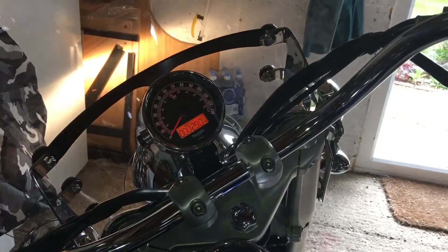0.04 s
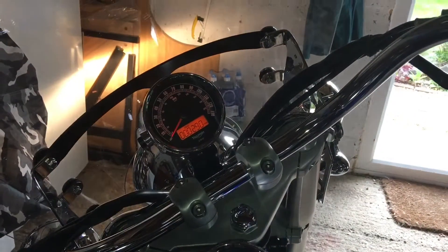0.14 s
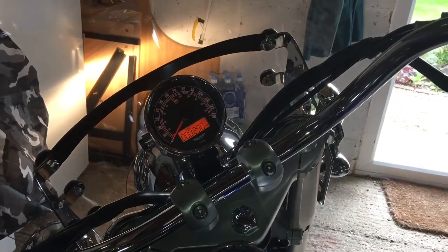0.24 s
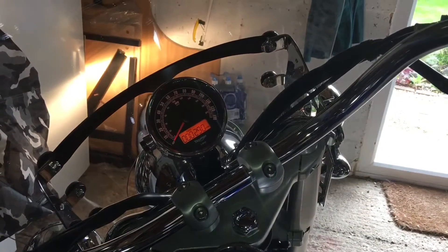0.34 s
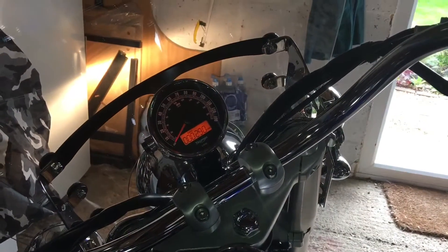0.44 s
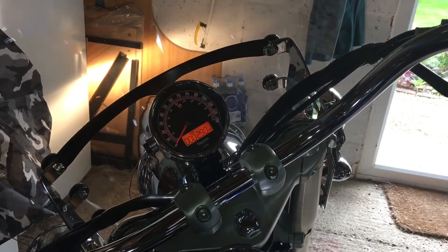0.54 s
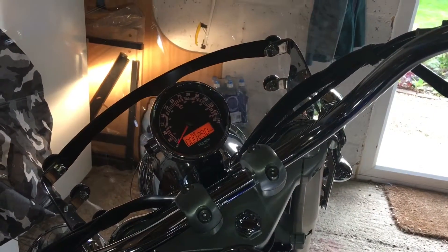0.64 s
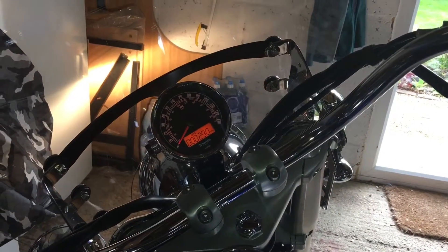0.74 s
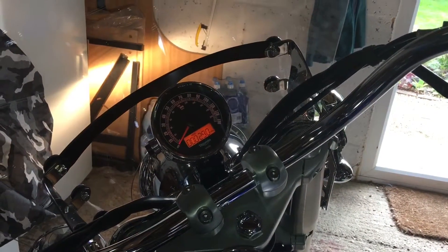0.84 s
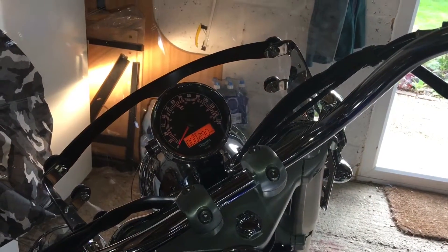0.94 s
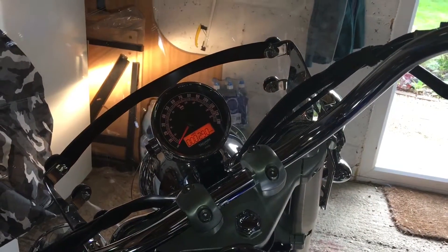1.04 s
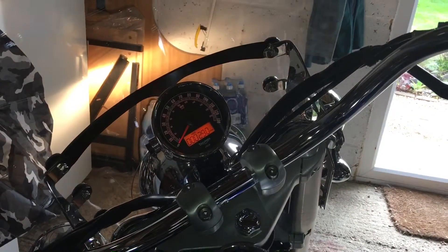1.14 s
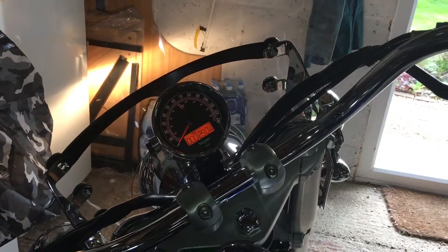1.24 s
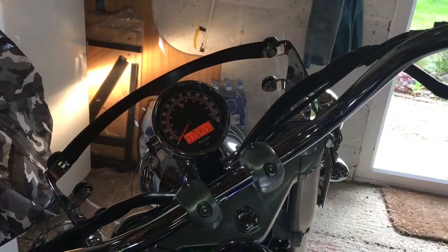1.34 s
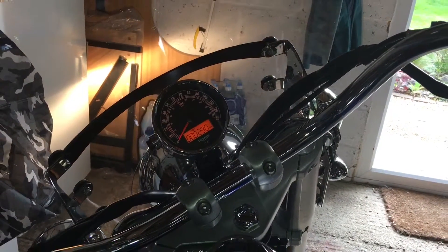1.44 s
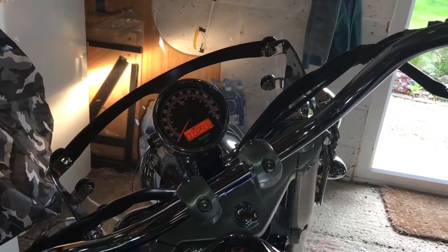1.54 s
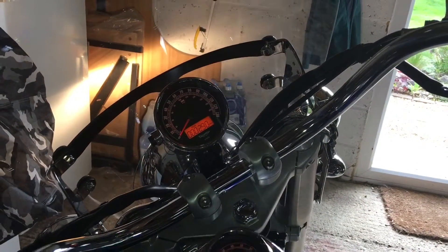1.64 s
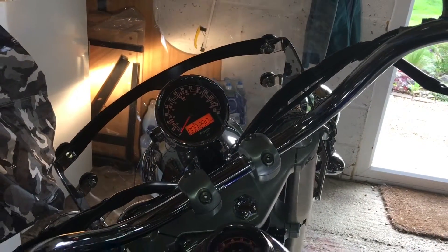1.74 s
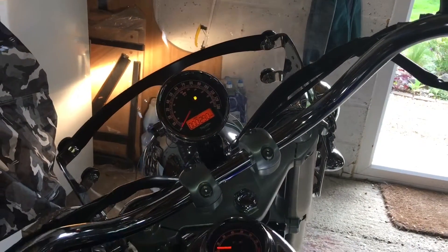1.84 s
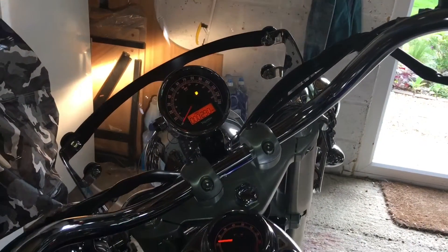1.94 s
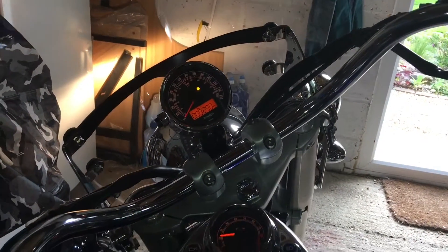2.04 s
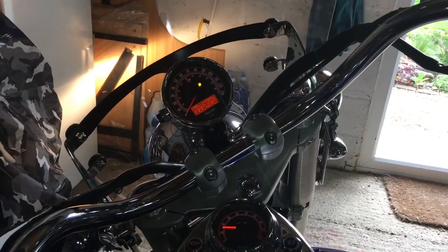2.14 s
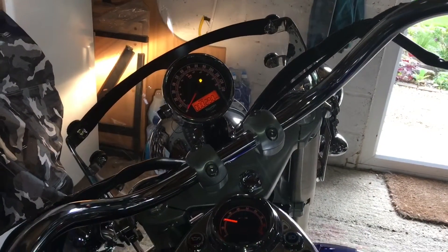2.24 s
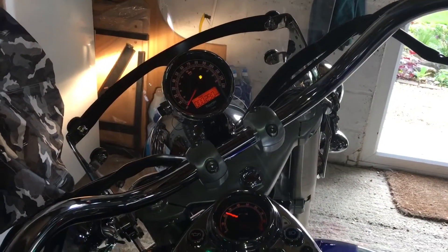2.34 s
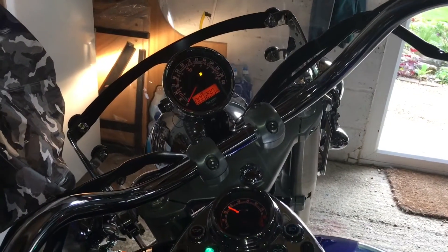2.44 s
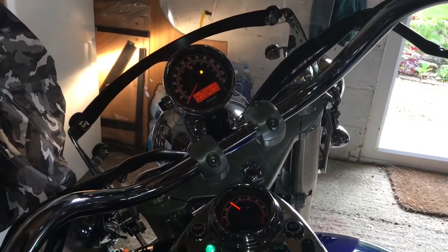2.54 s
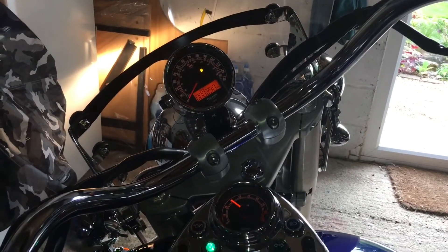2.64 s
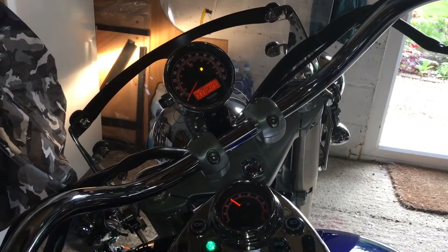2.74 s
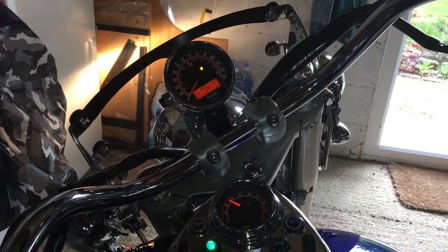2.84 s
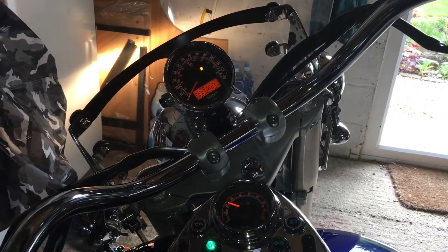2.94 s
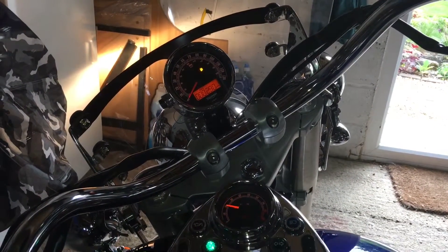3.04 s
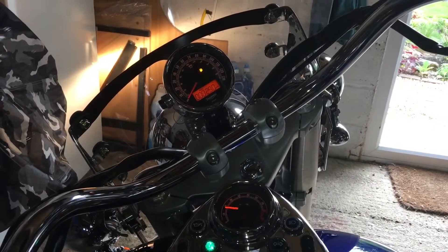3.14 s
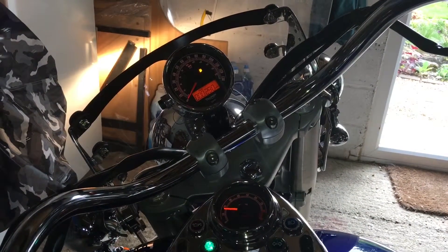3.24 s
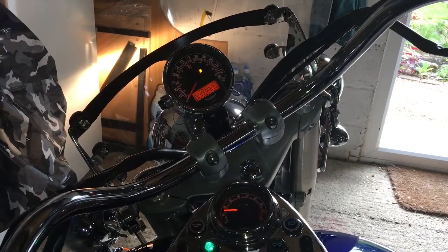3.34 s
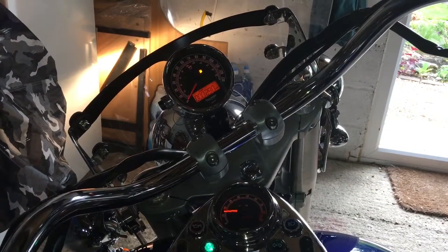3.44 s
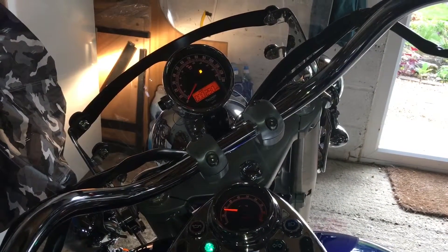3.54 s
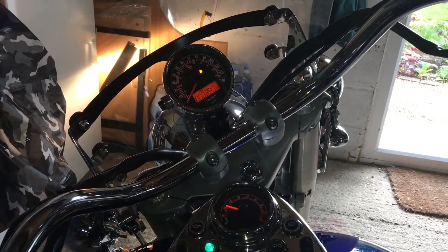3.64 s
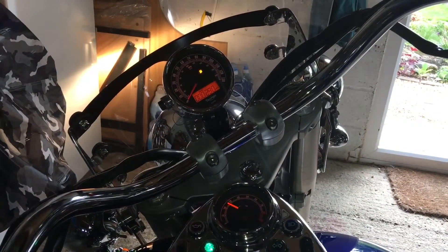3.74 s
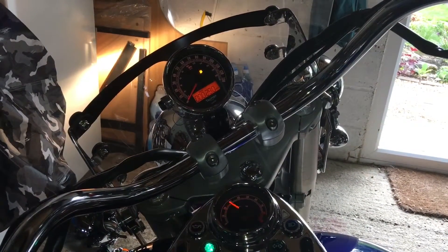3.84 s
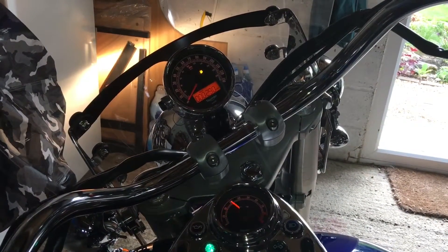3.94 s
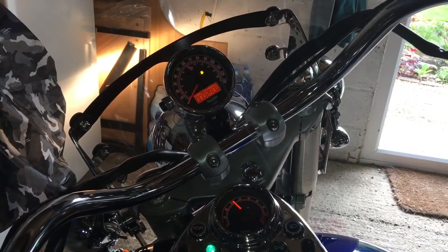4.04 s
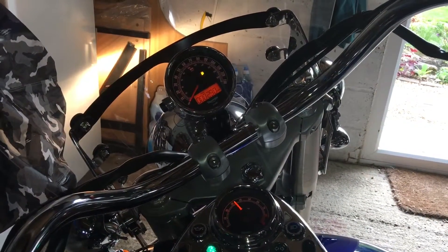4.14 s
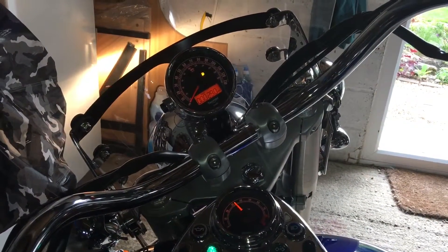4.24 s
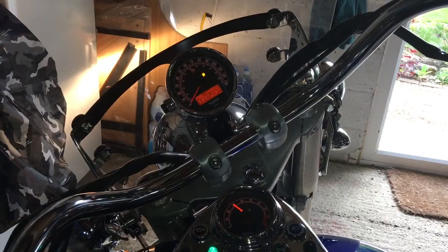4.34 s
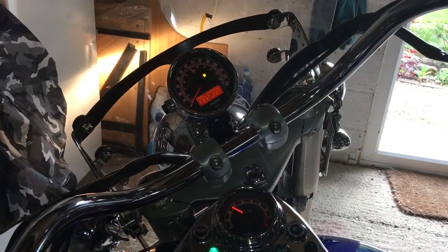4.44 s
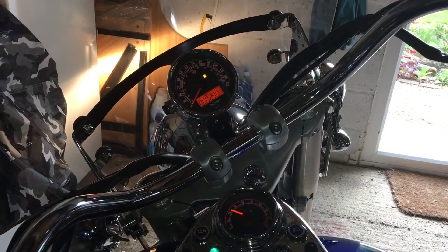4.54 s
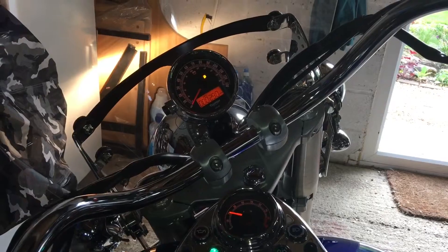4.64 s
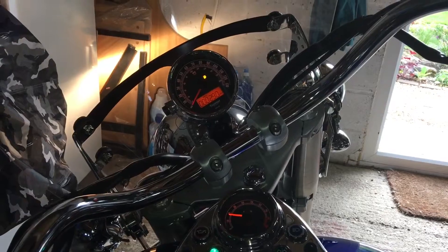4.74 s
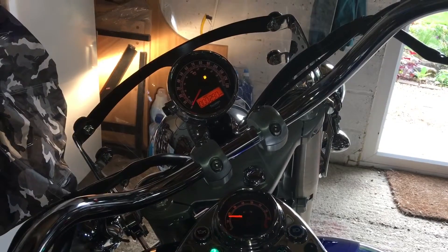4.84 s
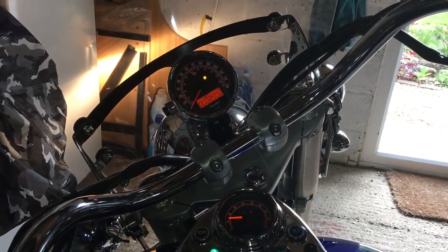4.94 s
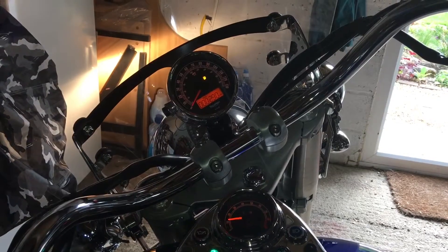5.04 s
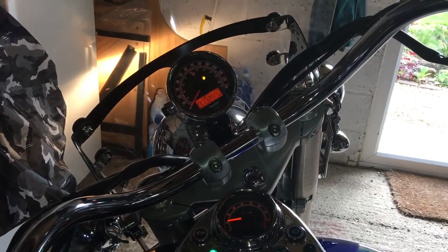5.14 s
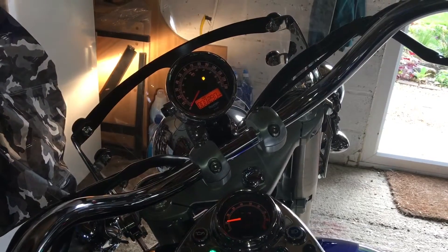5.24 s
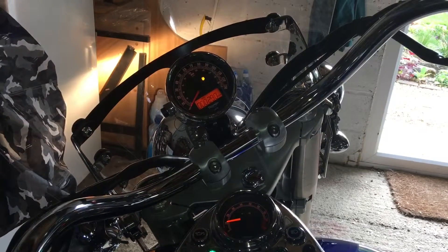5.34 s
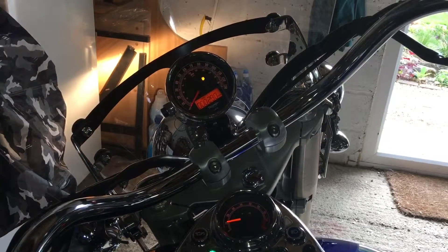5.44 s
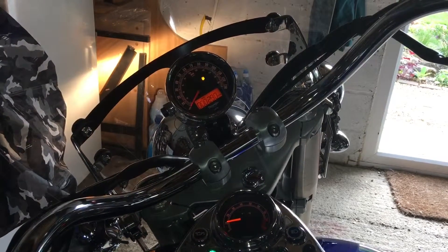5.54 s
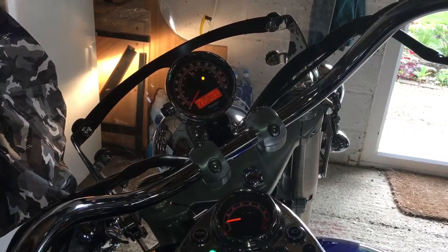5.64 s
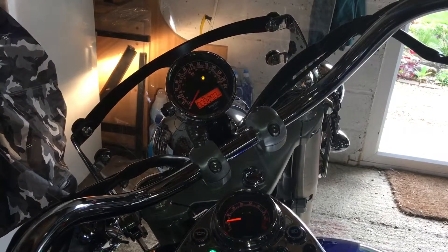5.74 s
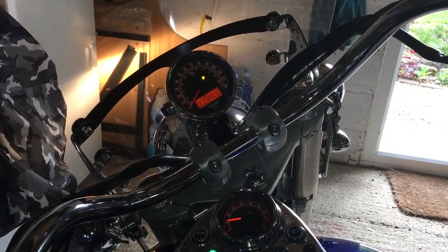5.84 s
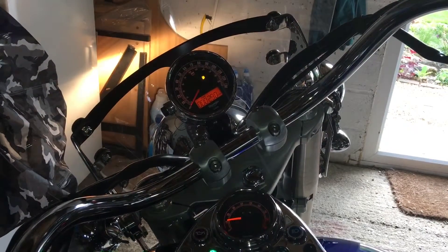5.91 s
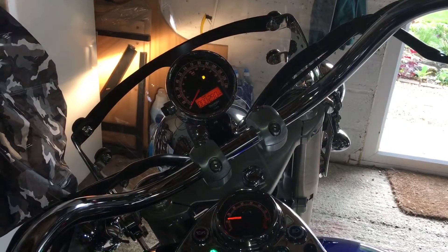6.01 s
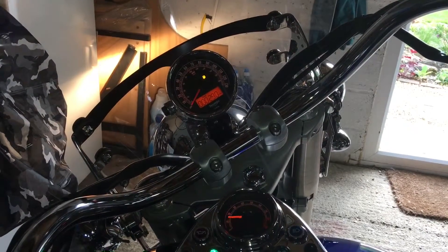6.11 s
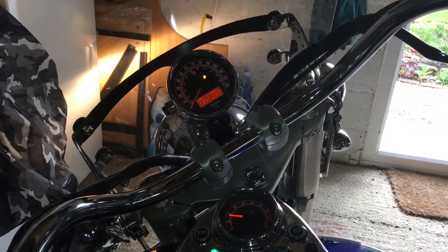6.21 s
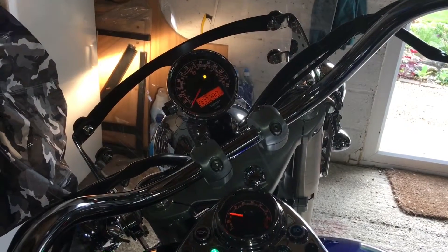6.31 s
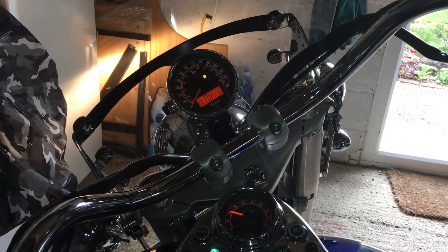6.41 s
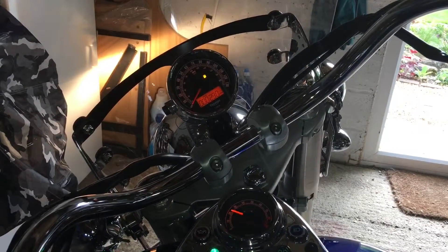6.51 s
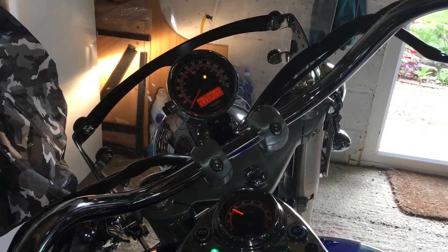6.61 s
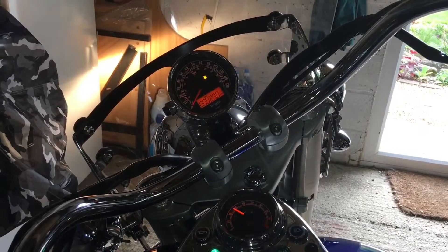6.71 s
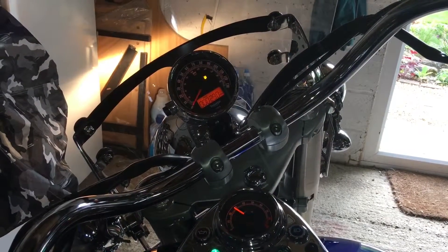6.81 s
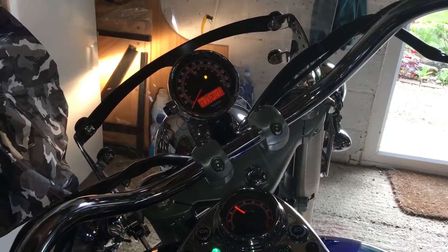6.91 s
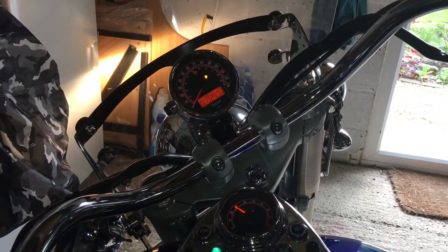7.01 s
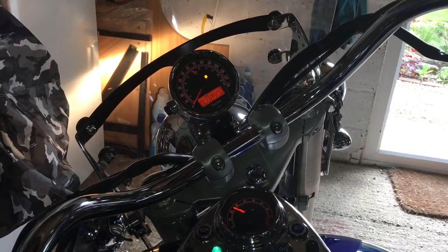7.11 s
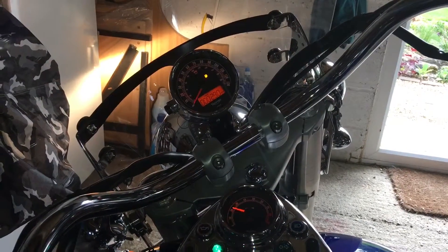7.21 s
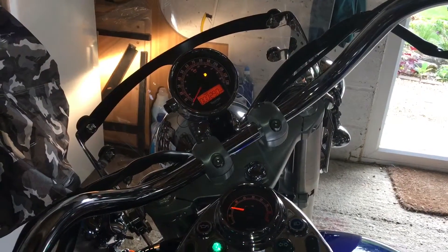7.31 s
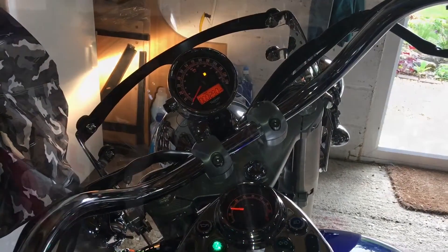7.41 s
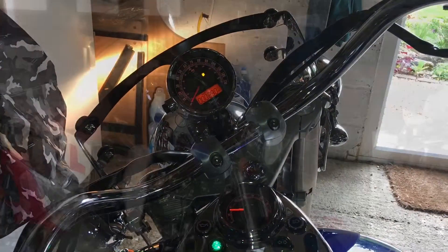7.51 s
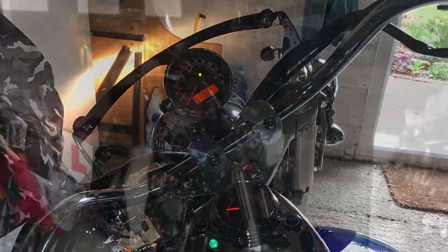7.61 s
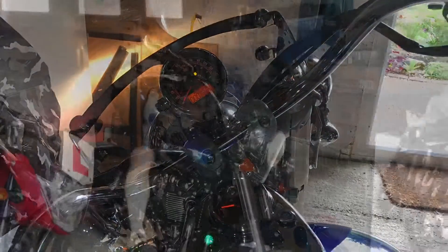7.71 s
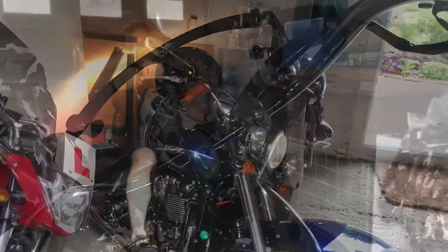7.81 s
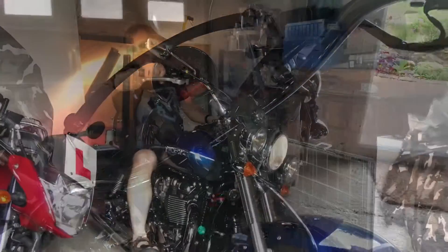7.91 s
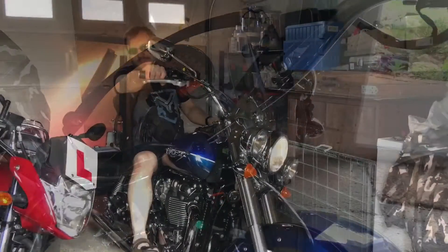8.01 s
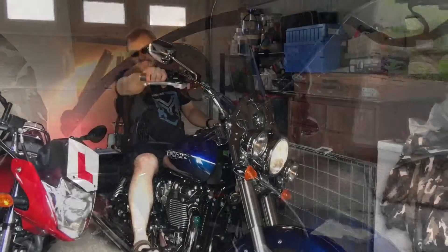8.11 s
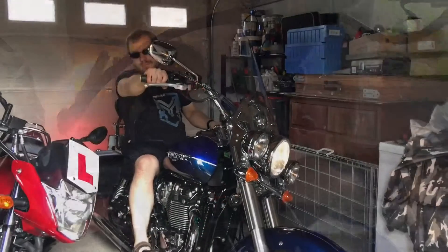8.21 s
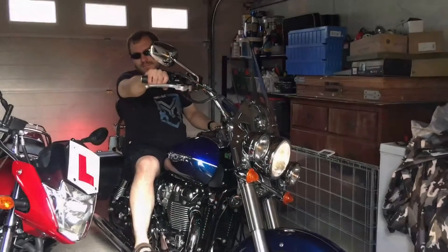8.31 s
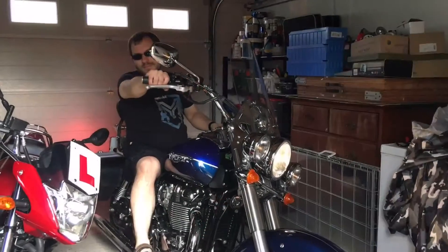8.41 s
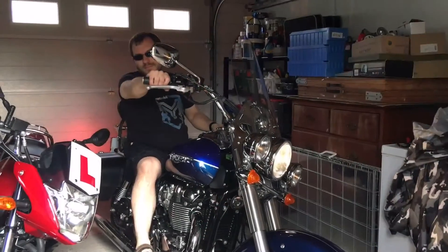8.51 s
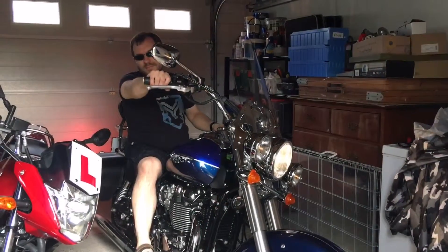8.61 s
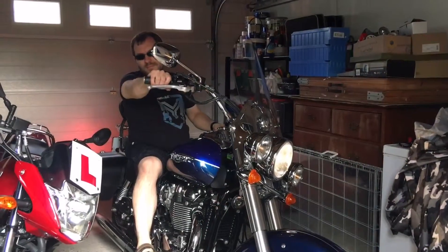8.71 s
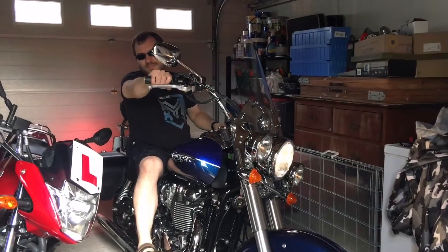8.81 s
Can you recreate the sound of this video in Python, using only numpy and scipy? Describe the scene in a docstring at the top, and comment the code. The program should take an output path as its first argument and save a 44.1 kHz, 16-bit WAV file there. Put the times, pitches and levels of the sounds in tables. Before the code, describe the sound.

A twin-cylinder motorcycle engine is heard close up in a garage through a small microphone thin in deep bass. It starts at raised revs, already falling, until about 0.5 s, when a strong blip climbs to the highest growl near 1.0 s; the throttle shuts with a low boom and revs sink to a lumpy idle by 1.95 s. A second burst peaks around 2.6 s and falls by 3.4 s; a third snaps open, peaks at 4.1 s, booms and drops to slow, uneven thumps from 4.9 to 5.7 s. A gentler swell peaks near 6.9 s and fades to idle by 7.7 s. Dense valve clatter, gear whine, raspy exhaust and pulsing intake hiss follow the speed. Around 7.6 s the sound crosses to a second position with weaker clatter and exhaust and stronger hiss, idling unevenly until a fresh throttle jab begins at 8.7 s.

```python
"""A twin-cylinder motorcycle engine idles in a garage and is blipped several times.
Two uneven firings a cycle thump through the exhaust and the garage, merging into a growl as the throttle
opens; rasping gas rings the panels, and a boom follows as it shuts. The valve gear clatters, gears whine
at multiples of the engine speed, and the intake hisses at each suction stroke. The small microphone is thin
in the bass; late on, the sound cuts to a second place with weaker clatter and exhaust and stronger hiss."""
import sys
import numpy as np
from scipy import signal
from scipy.fft import rfft, irfft, next_fast_len
from scipy.io import wavfile
from scipy.ndimage import uniform_filter1d

SR = 44100
rng = np.random.default_rng(int(sys.argv[2]) if len(sys.argv) > 2 else 0)


def materialize(psi):
    """Save the field psi as 16-bit PCM at rate SR to the path in sys.argv[1].

    A 1-D psi becomes a single channel; in a 2-D psi each row is a channel.
    """
    bounded = np.clip(np.atleast_2d(psi).T, -1, 1)
    quanta = np.round(bounded * 32767).astype(np.int16)
    wavfile.write(sys.argv[1], SR, quanta)


N = 390726

# engine speed: time_s, rate_cycles_per_s (four-stroke cycles)
ENGINE_SPEED = [(0.0, 22.63), (0.25, 16.7), (0.52, 12.0), (0.6, 14.01), (0.9, 29.67), (1.0, 30.47),
                (1.2, 24.77), (1.4, 17.48), (1.55, 14.11), (1.8, 9.27), (1.95, 7.79), (2.02, 8.0),
                (2.15, 14.76), (2.4, 22.58), (2.6, 25.7), (2.8, 19.32), (3.05, 13.73), (3.38, 8.86),
                (3.5, 14.79), (3.8, 23.97), (4.1, 27.7), (4.2, 27.21), (4.5, 17.0), (4.9, 8.5), (5.2, 7.15),
                (5.7, 7.53), (6.0, 10.3), (6.6, 21.32), (6.9, 23.25), (7.1, 17.93), (7.5, 9.8), (7.7, 7.34),
                (8.1, 7.55), (8.75, 7.4), (8.86, 9.01)]
# throttle blips: opens_s, rise_s, shuts_s, load (about 1 is full), held_share of that load, boom_db after shutting
THROTTLE_BLIPS = [(-.4, .05, 0.074, 0.76, .3, -28), (.53, 0.11, 1.038, 1., 0.24, -3.5),
                  (2.015, 0.012, 2.66, 1.01, 0.11, -27), (3.4, 0.0067, 4.19, .9, 0.42, -4.5),
                  (5.55, 0.54, 6.95, 0.6, 0.13, -22), (8.7, .06, 8.8, 0.8, .3, -60),
                  (8.805, 0.019, 10.7, 0.9, .3, -60)]
# firings out of line: time_s, length_s, level_db against the rest; weak ones are misfires
ODD_FIRINGS = [(0.458, 0.034, -14), (1.3, 0.014, -1), (1.7, 0.22, -4.5), (1.825, .03, 13),
               (1.953, 0.055, -13), (2.055, 0.032, 8.5), (2.18, 0.051, 4.5), (2.306, 0.11, 2.5),
               (2.945, 0.057, 4), (3.163, 0.088, -6), (3.26, 0.032, 4), (3.53, 0.034, 7), (3.64, 0.024, 0),
               (4.498, 0.023, 3), (4.59, .03, 0), (4.666, 0.03, -23), (4.848, 0.15, -5.5),
               (5.085, 0.037, -24), (5.195, 0.028, 0), (5.94, 0.019, 4), (6.122, 0.045, 4.5),
               (6.29, 0.12, 10), (7.195, 0.035, 6.5), (7.44, 0.14, -2.5), (8.13, .03, -3),
               (8.274, 0.053, -16), (8.38, .05, 2.5)]
# balance of the two cylinders: thump_db, hiss_db
CYLINDERS = [(-2.5, -2.0), (0, 0)]

# level laws: idle_db, per_speed_doubling_db, full_load_db, second_place_db
FIRING_LAW = (-15.5, 3, 10, -3)
RASP_LAW = (-31, 2.5, 7, -3.5)
CLATTER_LAW = (-34.5, 4.5, 5.5, -4)
INTAKE_LAW = (-58.5, 14, 7.5, 9)
IDLE_JET_LAW = (-58, 1, 14, -5)

# spectrum of the throttle hiss: frequency_hz, density_db
HISS_SPECTRUM = [(2000, 15), (5000, 13.5), (8000, 9), (9800, 5.5), (10500, -7), (11200, 4), (13000, -4),
                 (16000, -7)]
# spectrum of the small jet: frequency_hz, density_db
JET_SPECTRUM = [(3000, -25), (6000, -10), (9800, 1), (10500, -8), (11200, 6), (16000, -3)]
# knocks heard through the casing: frequency_hz, level_db
CASING_SPECTRUM = [(530, -20), (900, -30), (1270, -1.5), (1580, 1), (1930, 4), (2070, 1.5), (2250, 0),
                   (2930, -3), (4660, -8.5), (5180, -8.5), (6980, -11.5), (10500, -22.5), (15500, -24.5)]
# casing modes rung by the knocks: frequency_hz, width_hz, level_db
CASING_MODES = [(1290, 31, -33.5), (1574, 13, -51), (1797, 59, -33), (1906, 3.3, -21), (2240, 40, -14),
                (2413, 12, -17.5), (2936, 28, -19.5), (3950, 31, -26), (5270, 26, -24), (5850, 70, -26),
                (6310, 57, -28), (7200, 67, -28)]
# gear and chain whines: multiple of the cycle rate, level_db against the clatter, rise_db per speed doubling
GEAR_WHINES = [(48, -17, 5), (64, -19, 7), (96, -7, 0), (128, -9, 0), (206, -4, -6)]
# casing colour on the whines: frequency_hz, level_db
WHINE_CASING = [(700, -30), (960, -5.5), (1150, -7.5), (1400, -2), (1550, -0.7), (1750, 3), (2050, -1.5),
                (2400, 0.1), (2650, -10), (2950, 3), (3300, -15)]
# spectrum of the exhaust gas: frequency_hz, density_db
RASP_SPECTRUM = [(15, -21), (35, 15), (70, -8), (200, -1.5), (350, -9), (500, -11), (950, -10.5),
                 (1400, -14), (3000, -68)]
# panels set ringing by the rasp: frequency_hz, width_hz, level_db
PANEL_MODES = [(458.3, 8.8, -14), (531, 25, -30.5), (644, 10, -22), (298, 1.9, -28)]
# exhaust and garage modes: frequency_hz, width_hz, level_db
PIPE_MODES = [(44.4, 37, -11), (82.4, 7.44, -2), (95.04, 34, 4.9), (104.9, 17.9, -6.5), (137.4, 30.3, -12),
              (173, 29, -29), (233, 65, -9)]
# wall echoes of the thump: delay_s, level_db
WALL_ECHOES = [(.047, -12), (.09, -17)]
# growl of even firing: multiple of the cycle rate, level_db; 270 degree spacing weakens 4, 7, 9 and 12
GROWL_ORDERS = [(2, -12), (3, -8.5), (4, -15.5), (5, 1.84), (6, -4), (7, -19), (8, -17.5), (9, -16),
                (10, -16.5), (11, -25), (12, -47), (13, -28.5)]
# pipe colour on the growl: frequency_hz, level_db
GROWL_PIPE = [(40, -5), (70, -5.5), (85, 3), (105, 3), (130, -1), (170, -1.5), (250, -1.5), (400, 1)]

IDLE_RATE = 7.3  # cycles per s
FIRST, GAP = 0.06, 3 / 8  # first stroke and 270 crank degrees to the second, as shares of the cycle
SECOND_PLACE_S, CUT_FADE_S = 7.58, 0.17  # the sound cuts over to a second microphone place
SAG_S, SHUT_S = 0.31, 0.098  # the load sags to its held share as the revs catch up; time to shut
FILL_S = 0.039  # the charge reaches the cylinders this long after the throttle moves
# share of the firing that repeats evenly: at idle, per speed doubling, throttle open, under load
EVEN_AT_IDLE, EVEN_PER_DOUBLING, EVEN_OPEN, EVEN_LOAD = 0.13, 0.22, 0.54, -0.49
BOOM_RISE_S, BOOM_HOLD_S, BOOM_S = 0.019, 0.11, 0.05  # rise, hold and decay after the throttle shuts
BOOM_MULTIPLE, BOOM_HZ, BOOM_WIDTH_HZ = 3, 80, 33  # multiple of the cycle rate, and its pipe mode
EDGE_HZ = 15740  # upper limit of the microphone


def gain_of(db):
    """Amplitude factor of a level in dB."""
    return 10 ** (np.asarray(db) / 20)


def evened(x):
    """Scales x to rms 1."""
    return x / np.sqrt(np.mean(x ** 2) + 1e-20)


def curve(rows):
    """Second column of a table against time, joined by straight lines at every sample."""
    time_s, value = np.transpose(rows)
    return np.interp(np.arange(N) / SR, time_s, value)


def read(points, hz):
    """A spectrum read on a log-frequency axis."""
    f, value = np.transpose(points)
    return np.interp(np.log(hz + 1), np.log(f + 1), value)


def coloured(x, points):
    """Filters x by a spectrum, to rms 1."""
    size = next_fast_len(N)
    gain = gain_of(read(points, np.fft.rfftfreq(size, 1 / SR)))
    return evened(irfft(rfft(x, size) * gain, size)[:N])


def high_pass(x, hz):
    """Second-order cut of everything below hz."""
    return signal.sosfilt(signal.butter(2, hz, "high", fs=SR, output="sos"), x)


def resonate(x, hz, width):
    """Shifts the curve hz down to zero, smooths, and shifts back: a resonance of gain 1."""
    turn = np.exp(2j * np.pi * np.cumsum(hz * np.ones(len(x))) / SR)
    r = np.exp(-np.pi * width / SR)
    return 2 * (turn * signal.lfilter([1 - r], [1, -r], x / turn)).real


def ringing(x, modes):
    """Sum of resonances driven by x, each at its own level."""
    return sum(gain_of(db) * evened(resonate(x, hz, width)) for hz, width, db in modes)


def wander(seconds):
    """Slow chance of rms 1."""
    size = max(round(seconds * SR), 2)
    once = uniform_filter1d(rng.standard_normal(N), size)
    return evened(uniform_filter1d(once, size))


def ramp(start, seconds):
    """Rises from 0 to 1 in a straight line."""
    return np.clip((np.arange(N) / SR - start) / seconds, 0, 1)


def strokes(cycles, place, width):
    """A puff once a cycle that rises around place and dies away, width as a share of the cycle."""
    since = (cycles - place + width) % 1 / width
    return since * np.exp(1 - since)


def places(rate, squeeze=0.068):
    """Where each cylinder acts; at idle the first firing kicks the crank on, so the second comes early."""
    return FIRST + 0 * rate, FIRST + GAP - squeeze * (rate.min() / rate) ** 2


def throttle():
    """How far the throttle stands open, how hard the engine pulls, and the size of the boom after shutting."""
    t, opening, load, boom = np.arange(N) / SR, 0, 0, 0
    for opens, rise, shuts, strength, held, boom_db in THROTTLE_BLIPS:
        window = ramp(opens, rise) * (1 - ramp(shuts, SHUT_S))
        sag = np.exp(-np.maximum(t - opens - rise, 0) / SAG_S)
        opening = opening + window
        load = load + strength * window * (held + (1 - held) * sag)
        since_hold = np.maximum(t - shuts - BOOM_RISE_S - BOOM_HOLD_S, 0)
        boom = boom + gain_of(boom_db) * ramp(shuts, BOOM_RISE_S) * np.exp(-since_hold / BOOM_S)
    return opening, load, boom


def level_db(law, rate):
    """Level of a layer from speed, load and microphone place."""
    idle_db, doubling_db, load_db, second_place_db = law
    speed_db = doubling_db * np.log2(rate / IDLE_RATE)
    place_db = second_place_db * ramp(SECOND_PLACE_S, CUT_FADE_S)
    return idle_db + speed_db + load_db * throttle()[1] + place_db


def air_through(cycles, rate, law, spectrum, steady, width):
    """Noise gulped at each suction stroke over a steady share, its swings kept and its slow level evened."""
    gulps = steady
    for place, (_, hiss_db) in zip(places(rate), CYLINDERS):
        gulps = gulps + gain_of(hiss_db) * strokes(cycles, place, width)
    gulps /= np.sqrt(uniform_filter1d(gulps ** 2, SR // 4))
    return gain_of(level_db(law, rate)) * coloured(gulps * rng.standard_normal(N), spectrum)


def intake(cycles, rate):
    """Air hisses past the throttle, gulps running together at speed; a small jet adds separate spits."""
    hiss = air_through(cycles, rate, INTAKE_LAW, HISS_SPECTRUM, rate / rate.min(), 0.022)
    jet = air_through(cycles, rate, IDLE_JET_LAW, JET_SPECTRUM, 0.13, 0.072)
    return hiss + jet


def gear_whines(rate):
    """Rough tones of gears and chain: narrow noise following multiples of the cycle rate."""
    whines = 0
    for multiple, db, rise_db in GEAR_WHINES:
        hz = multiple * rate
        tone = evened(resonate(rng.standard_normal(N), hz, 0.22 * multiple))
        whine_db = db + rise_db * np.log2(rate / rate.min()) + read(WHINE_CASING, hz) + 2.5 * wander(0.08)
        whines = whines + gain_of(whine_db) * tone
    return whines


def clatter(cycles, rate, ticks_per_cycle=260, tick_db=3.5, throb=0.24):
    """Dense small knocks of valves, chain and pistons heard through the casing, with gear whines."""
    dense = rng.random(N) < ticks_per_cycle * rate / SR
    knocks = dense * rng.standard_normal(N) * gain_of(tick_db * rng.exponential(1, N)) / np.sqrt(rate)
    knocks = evened(knocks) + 2.3 * rng.standard_normal(N)  # the garage smears most knocks into a wash
    knocks *= 1 + throb * sum(strokes(cycles, place, 0.025) for place in places(rate))
    body = coloured(knocks, CASING_SPECTRUM)
    treble = high_pass(body, 2600)
    body -= 0.55 * (rate.min() / rate) ** 2 * treble  # slow knocks are soft and dull
    body += (rate / rate.mean()) ** 1.1 * ringing(knocks, CASING_MODES)
    return gain_of(level_db(CLATTER_LAW, rate)) * (body + gear_whines(rate))


def rasp(cycles, rate, depth=0.23):
    """Turbulent gas leaves the pipe in puffs and rings the tank and side panels."""
    puffs = 1 + depth * sum(strokes(cycles, place + 0.03, 0.18) for place in places(rate))
    gas = puffs * rng.standard_normal(N)
    return gain_of(level_db(RASP_LAW, rate)) * (coloured(gas, RASP_SPECTRUM) + ringing(gas, PANEL_MODES))


def overrun(cycles, rate):
    """As the throttle shuts, one low multiple of the cycle rate booms in a low pipe mode."""
    tone = np.cos(2 * np.pi * BOOM_MULTIPLE * cycles)
    return resonate(throttle()[2] * tone, BOOM_HZ, BOOM_WIDTH_HZ)


def evenness(rate):
    """Firing repeats more evenly at speed with the throttle held, less while the engine pulls hard."""
    opening, load, _ = throttle()
    from_speed = EVEN_AT_IDLE + EVEN_PER_DOUBLING * np.log2(rate / IDLE_RATE)
    return np.clip(from_speed + EVEN_OPEN * opening + EVEN_LOAD * load, 0, 1)


def firing_db(rate):
    """Firing strength: the level law, delayed by the filling of the cylinders, and the odd firings."""
    t, size = np.arange(N) / SR, round(FILL_S * SR)
    late = uniform_filter1d(level_db(FIRING_LAW, rate), 2 * size + 1, origin=size)  # past samples only
    return late + sum(db * np.exp(-((t - s) / length) ** 2) for s, length, db in ODD_FIRINGS)


def pipe_and_garage():
    """Answer of pipe and garage to one blow: decaying modes, then wall echoes, to unit energy."""
    t = np.arange(SR // 3) / SR
    modes = 0
    for hz, width, db in PIPE_MODES:
        decay = np.sqrt(width) * np.exp(-np.pi * width * t)
        modes = modes + gain_of(db) * decay * np.sin(2 * np.pi * hz * t)
    modes *= (1 - np.exp(-t / 0.0093)) ** 2  # the silencer softens the start
    room = np.zeros(SR // 8)
    room[0] = 1
    for delay, db in WALL_ECHOES:
        room[round(delay * SR)] = gain_of(db)
    answer = high_pass(signal.fftconvolve(modes, room), 62)
    return answer / np.linalg.norm(answer)


def growl(cycles, rate, spread=0.8):
    """Even firing at speed: clean multiples of the cycle rate, dispersed by the pipe."""
    total = 0
    for k, db in GROWL_ORDERS:
        order_db = db + read(GROWL_PIPE, k * rate) + 2.1 * wander(0.13)
        total = total + gain_of(order_db) * np.cos(2 * np.pi * k * cycles + spread * k * k)
    return total


def exhaust(cycles, rate, lag_s=0.0039, scatter_db=1.8, scatter_s=0.0012):
    """One blow per firing, uneven in size and time, merging into a growl when the throttle opens."""
    blows, even = np.zeros(N + SR), evenness(rate)
    luck = rng.standard_normal((400, 2, 2))
    for k, (place, (thump_db, _)) in enumerate(zip(places(rate), CYLINDERS)):
        at = np.flatnonzero(np.diff(np.floor(cycles - place)) > 0)
        size, late = luck[:len(at), k].T
        blows[at + np.round((lag_s + late * scatter_s) * SR).astype(int)] += gain_of(thump_db + scatter_db * size)
    strength = gain_of(firing_db(rate))
    uneven_blows = blows[:N] * strength * (1 - even) / np.sqrt(rate / SR)
    thumps = signal.oaconvolve(uneven_blows, pipe_and_garage())[:N]
    growl_strength = uniform_filter1d(strength * even, SR // 20)
    return gain_of(-1.5) * thumps + gain_of(-6.5) * growl_strength * growl(cycles, rate)


def scene():
    """Intake, casing, rasp, boom and exhaust, all on one crank."""
    rate = curve(ENGINE_SPEED)
    cycles = np.cumsum(rate) / SR
    return sum(part(cycles, rate) for part in (intake, clatter, rasp, overrun, exhaust))[None]


def record(dry):
    """Small microphone thin in the deep bass, soft overload, band limit."""
    soft = np.tanh(high_pass(dry, 55))
    band_limit = signal.firwin(2047, EDGE_HZ, window=("kaiser", 9), fs=SR)
    return signal.oaconvolve(soft, band_limit[None], "same")


dry = scene()
out = record(dry)
materialize(out)
```